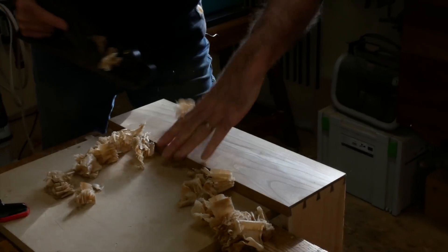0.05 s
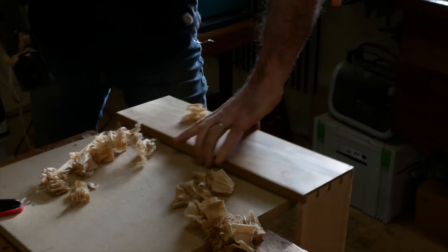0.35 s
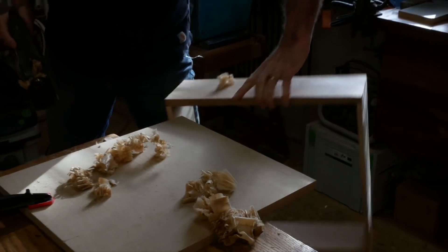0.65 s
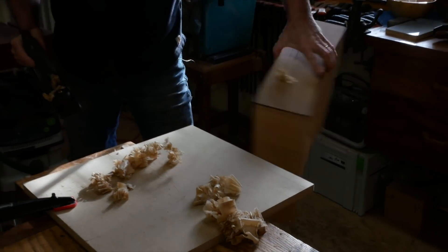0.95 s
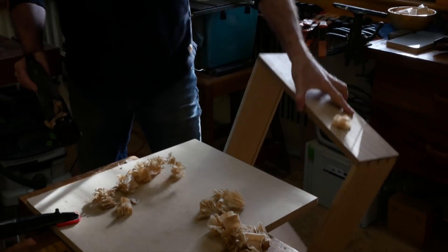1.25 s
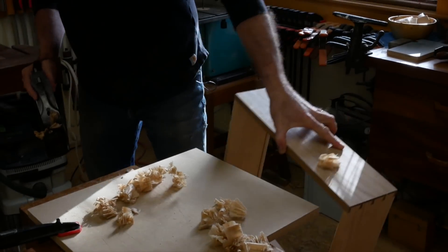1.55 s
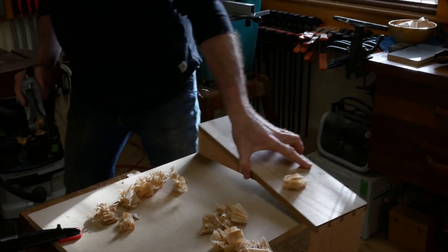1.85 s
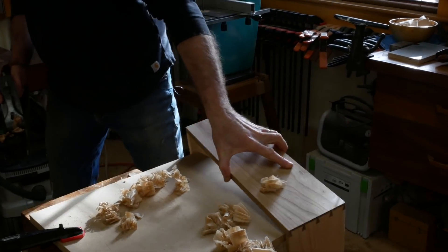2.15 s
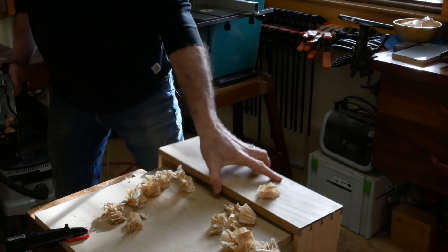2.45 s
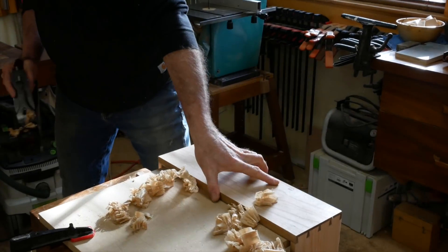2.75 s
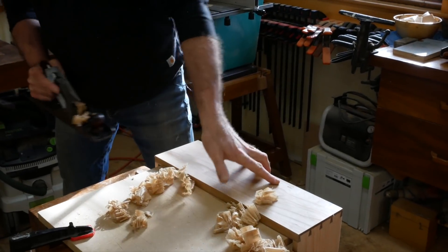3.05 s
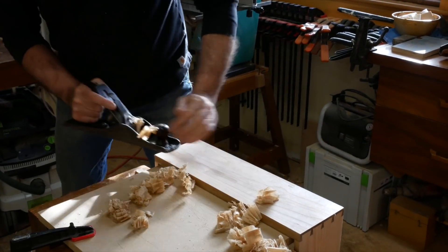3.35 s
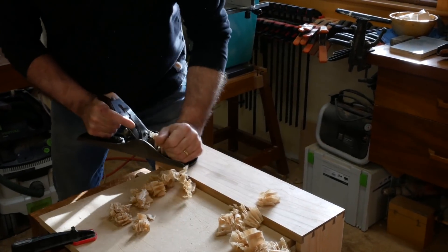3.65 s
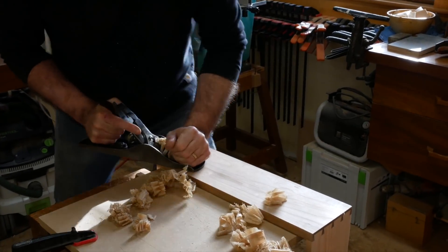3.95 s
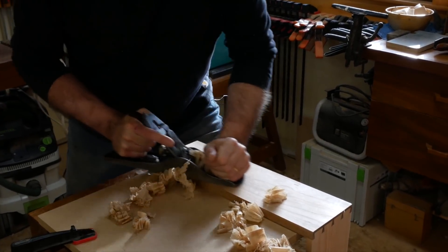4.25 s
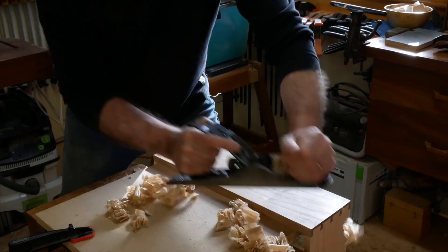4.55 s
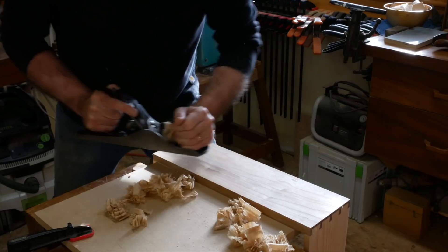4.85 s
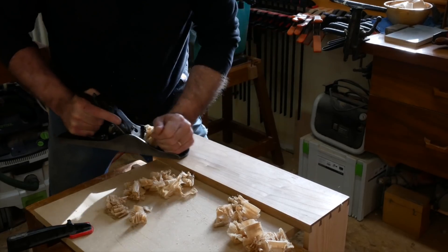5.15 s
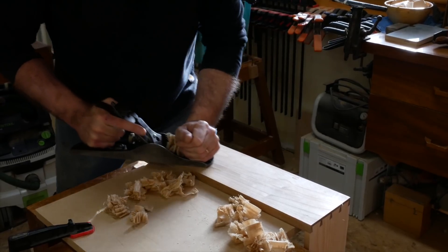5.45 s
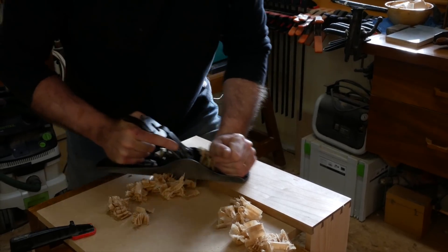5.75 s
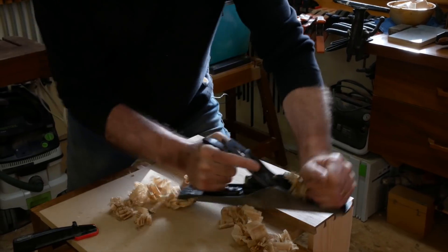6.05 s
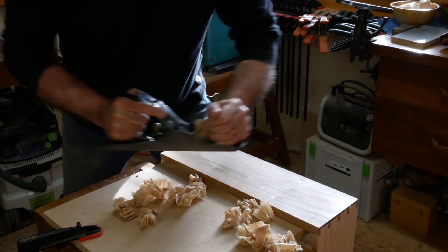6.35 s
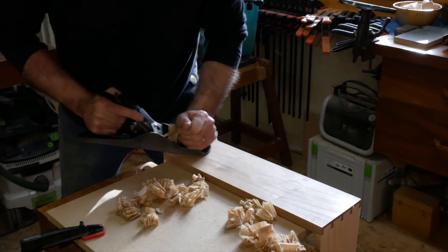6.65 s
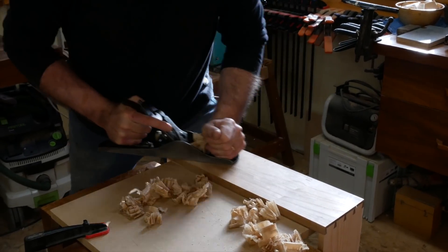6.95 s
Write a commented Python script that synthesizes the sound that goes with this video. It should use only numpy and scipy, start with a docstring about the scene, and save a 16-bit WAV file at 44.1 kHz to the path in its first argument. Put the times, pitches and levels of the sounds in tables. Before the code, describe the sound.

A wooden box slides off a workbench with a rub and a knock, then bumps back and rocks to rest with hollow clatters. A metal hand plane knocks down onto it and shaves the wood in three rough, hissing strokes with short pauses. Small bright ticks and faint squeaks fall between the strokes, over a low bench rumble. The microphone is close, in a small, slightly reverberant workshop.

```python
"""In a small workshop an open wooden box slides off the bench with a rub, is turned round, bumps back over the
bench top and rocks to rest. From 3.5 s a metal hand plane is set down on it three times, each knock ringing
their modes, and pushed along the grain while the bench rumbles. Tearing fibres shake the board, the iron and
the shaving, which hisses out of the mouth. As the first two long pushes end, air squeaks under the plane's sole
as it lifts and the shaving snaps off. One close microphone hears it all, with the room's reverberation."""
import sys
import numpy as np
from scipy import signal
from scipy.fft import rfft, irfft
from scipy.io import wavfile

SR = 44100
rng = np.random.default_rng(int(sys.argv[2]) if len(sys.argv) > 2 else 0)


def store_pcm(level_fs):
    """Save levels as 16-bit WAV."""
    pcm = np.round(np.clip(level_fs, -1, 1) * 32767).astype(np.int16)
    wavfile.write(sys.argv[1], SR, np.atleast_2d(pcm).T)


N = 317520

# Levels in the tables are relative. Spectra have in each row: frequency in Hz, density in dB.
# Wood and hands slide. Each row: loudest moment, rise and fall constants in seconds, rub and brush in dB.
SLIDES = [(.02, 0.017, 0.017, -49.5, -47.5), (.405, 0.044, .04, -29.5, -42), (.55, 0.014, 0.03, -41, -52),
          (1.05, 0.023, 0.014, -55, -63.5), (1.15, 0.027, 0.033, -44.5, -57),
          (1.886, 0.0018, 0.015, -46.5, -57), (1.919, 0.0082, 0.071, -37.5, -57),
          (2.35, 0.2, 0.13, -48.5, -52.5), (2.58, 0.022, 0.025, -33, -67.5)]
RUB_SPECTRUM = [(150, -37), (250, -7), (311, -21), (547, -1.5), (605, -8.5), (731, -4), (1150, -9.5),
                (1320, -1), (1880, -5), (2300, -3), (2820, -2.5), (4290, -10), (5410, -16), (8000, -34),
                (10400, -40.5), (17600, -120)]   # the body of the friction noise
BRUSH_SPECTRUM = [(3530, -6), (6000, -2), (7710, -4), (13400, 4), (15000, 4.5), (16000, -13)]   # its high hiss
# The box bumps the bench. Each row: start in seconds, force, extra thump and extra treble in dB.
BOX_BUMPS = [(.558, -15, 6, 13), (1.026, -44, -12, -10), (1.495, -61, -5, 4), (1.957, 2, -1, -29),
             (2.035, -16, 4.5, -13), (2.197, -19, 10.5, 1), (2.476, -16, 4, -2.5), (2.596, 2.5, -1.5, -15),
             (2.676, 0, -2, -26), (2.85, -23, 9, -40), (4.728, -14, -8, -5)]
# Modes of the free box. Each row: frequency in Hz, level in dB, t60 in seconds.
BOX_MODES = [(91.3, -27, 0.18), (135.7, -31.5, 0.29), (244.1, -23.5, 0.34), (311, -20, 0.14),
             (494, -31, 0.23), (562, -20, 0.066), (659, -16.5, 0.088), (742.5, -22.5, 0.15),
             (826, -21.5, 0.099), (923, -17.5, 0.073), (1090, -23.5, 0.052), (1286, -25.5, .08),
             (1430, -29, .05), (1520, -35, 0.079), (1894, -20.5, 0.041), (2140, -26.5, 0.045)]
CRACK_SPECTRUM = [(100, -6), (300, 11), (800, -2.5), (1500, 1.5), (2500, -11), (4000, -13.5), (7000, -28.5),
                  (11000, -30), (16000, -39)]   # the many short-lived modes of struck wood
# The box rocks to rest. Each row: start and length in seconds, first force and extra thump in dB.
SETTLING = [(1.963, .38, -14.5, 7), (2.603, .27, -12.5, -4.5)]
# Shavings snap and the plane's loose parts tick. Each row: start in seconds, level and extra clink in dB.
TICKS = [(3.176, -36.5, -9), (3.603, -11, -2), (4.5272, -12, 4), (4.565, -17.5, -6), (4.6162, -15, 2),
         (4.6951, -5, -3.5), (6.2113, -32, 7.5)]
SNAP_SPECTRUM = [(3820, -32), (6500, -8.5), (7040, -25.5), (7590, 2), (8240, -14), (9480, -0.5),
                 (12500, -9), (13900, -4), (16000, -2.5)]   # the bright top of a tick
# The lower ring of a tick. Each row: frequency and bandwidth in Hz, level in dB.
CLINK_PEAKS = [(2200, 92, -5.5), (3090, 170, -1.5), (4090, 180, -0.5), (4840, 87, 3.5), (5390, 64, 2.5)]
# The plane lands. Each row: start in seconds, toe force, extra thump, extra treble and heel force in dB.
LANDINGS = [(3.551, -2, 0.5, 10.5, -2), (3.928, -9, 3.5, -5, -9), (5.078, -1.5, -6, 6.5, -21),
            (6.68, -4, -7, 6, -23.5)]
# Modes of the plane pressed on the box. Each row: frequency in Hz, level in dB, t60 in seconds.
PLANE_MODES = [(97, -31.5, 0.28), (131, -23, 0.11), (206.7, -21.5, 0.13), (241, -18, 0.15),
               (282, -9.5, 0.12), (386, -16.5, 0.075), (482, -16, 0.38), (631, -15.5, 0.16),
               (732, -17, 0.086), (848, -26.5, 0.06), (931, -15, 0.034), (1115, -17, 0.035),
               (1285, -17, 0.12), (1398, -14, 0.032), (1519, -19.5, 0.047), (1800, -22, 0.032),
               (1880, -24, 0.06), (3110, -25.5, 0.048), (3320, -23.5, 0.026), (3680, -21, 0.016),
               (4330, -32.5, 0.016), (5520, -32.5, 0.041)]
# Weight comes onto the bench or leaves it. Each row: start and end in seconds, level in dB.
BENCH_ROCKING = [(3.91, 4.09, -47), (4.543, 4.777, -48.5), (4.933, 5.197, -49.5), (6.373, 6.893, -48.5)]
RUMBLE_SPECTRUM = [(15, -50), (25, -15), (54, 1), (150, -3.5), (195, -5), (220, -0.5), (290, -12.5),
                   (480, -120)]   # the rocking bench
# Long cuts and short nudges of the plane.
# Each row: start, hardest moment and end in seconds, effort, extra board and extra shaving in dB.
PUSHES = [(4.115, 4.26, 4.5, .5, 0, 1.5), (4.567, 4.57, 4.6, -14, 7, 4), (5.325, 5.335, 5.36, -9, -1, 1),
          (5.48, 6.02, 6.06, 0, 2, -1), (6.214, 6.218, 6.235, -13, -5, 3),
          (6.802, 6.815, 6.84, -8.5, 0, -1), (6.945, 7.19, 7.3, 1, -5, -3)]
BOARD_SPECTRUM = [(53, -45), (90, -29), (204, -8.5), (251, -1), (441, -5), (569, -1.5), (754, -2), (832, 0),
                  (971, -7), (1060, -2.5), (1360, -7), (1960, -6.5), (2140, -4), (2360, -8.5), (2600, -2),
                  (3380, -68), (5720, -120)]   # the wood under the cut
# Resonances of iron, curling shaving and edge. Each row: frequency and bandwidth in Hz, level in dB.
IRON_PEAKS = [(2726, 200, -0.5), (3050, 280, -2.5), (3534, 285, 1), (3840, 260, 1.5), (4170, 380, -1.5),
              (4900, 470, -7.5), (5550, 440, -5)]
CURL_PEAKS = [(7500, 2000, -6), (9330, 470, 3.5), (9800, 660, -0.5), (10350, 420, 1), (11030, 330, -4)]
EDGE_PEAKS = [(11900, 600, -12), (13640, 1600, 20), (14300, 600, -12), (15000, 540, 14)]
# Air squeaks under the lifting sole. Each row: centre in seconds, level in dB, pitch in Hz, half-length in
# seconds.
SQUEAKS = [(4.556, -30, 590, 0.0086), (4.735, -22, 415, 0.0092), (4.770, -30.5, 170, 0.0039),
           (6.12, -30, 660, 0.01)]
# Decay of the workshop's reverberation. Each row: frequency in Hz, t60 in seconds.
ROOM_T60 = [(80, .85), (210, .75), (560, .75), (1470, .75), (3900, .8), (12000, .9)]
# Strength of the reverberation. Each row: frequency in Hz, level in dB.
ROOM_LEVELS = [(80, 1.5), (250, -8), (600, -5.5), (1400, -5.5), (3500, -9), (12000, -8.5)]
BACKGROUND_SPECTRUM = [(12, -30.5), (20, 4.5), (150, -8), (210, -9), (301, -10), (410, -11), (485, -4),
                       (527, -12.5), (897, -14.5), (1220, -16), (1330, -11.5), (2750, -14), (4940, -17),
                       (8650, -20.5), (16000, -21)]   # steady, mostly low noise


def from_db(db):
    """Amplitude grows tenfold with every 20 dB."""
    return 10 ** (np.asarray(db) / 20)


def unit_rms(x):
    """Dividing by the rms gives a signal unit power."""
    return x / np.sqrt(np.mean(x ** 2) + 1e-20)


def at_hz(points, hz):
    """Interpolation follows log frequency, as pitch does."""
    knots_hz, values = np.transpose(points)
    return np.interp(np.log(np.maximum(hz, 1)), np.log(knots_hz), values)


def colour(x, spectrum):
    """Filtering multiplies spectra; this filter falls steeply past its ends. The result has rms 1."""
    hz = np.fft.rfftfreq(len(x), 1 / SR) + 1
    skirts = 1 / (1 + (.8 * spectrum[0][0] / hz) ** 8) / (1 + (.8 * hz / spectrum[-1][0]) ** 8)
    return unit_rms(irfft(rfft(x) * from_db(at_hz(spectrum, hz)) * skirts, len(x)))


def resonate(x, peaks):
    """Forced resonators respond in parallel; the sum is band-limited and has rms 1."""
    out = 0
    for k, (hz, width, db) in enumerate(peaks):
        radius = np.exp(-np.pi * width / SR)
        poles = [1, -2 * radius * np.cos(2 * np.pi * hz / SR), radius ** 2]
        out = out + (-1) ** k * from_db(db) * (1 - radius ** 2) / 2 * signal.lfilter([1, 0, -1], poles, x)
    return unit_rms(butter(out, [0.81 * peaks[0][0], 1.11 * peaks[-1][0]], "band"))


def butter(x, hz, kind, order=2):
    """A causal Butterworth filter has a maximally flat passband."""
    return signal.sosfilt(signal.butter(order, np.clip(hz, 10, .45 * SR), kind, fs=SR, output="sos"), x)


def drift(per_s):
    """Random values joined by straight lines make a smooth fluctuation of rms 1."""
    knots = rng.standard_normal(int(N / SR * per_s) + 2)
    return unit_rms(np.interp(np.arange(N) / SR * per_s, np.arange(len(knots)), knots))


def grains(per_s, spread_db):
    """Independent clicks of uneven size make shot noise."""
    clicks = (rng.random(N) < per_s / SR) * rng.choice([-1, 1], N)
    return clicks * from_db(spread_db * np.minimum(rng.exponential(1, N), 5)) + 1e-18


def envelope(start, end, rise_s, fall_s):
    """Exponential growth and decay, given as time constants, flank a hold from start to end."""
    t = np.arange(N) / SR
    exponent = np.minimum(t - start, 0) / rise_s - np.maximum(t - end, 0) / fall_s
    return np.exp(np.maximum(exponent, -40))


def add(track, start, sound):
    """By superposition, a sound adds to the track from its start in seconds."""
    i = max(int(start * SR), 0)
    track[i:i + len(sound)] += sound[:N - i]


def sliding(rub_db, brush_db):
    """Sliding friction is noise: smooth wood catches lightly on many tiny points."""
    rub, brush = sum(np.outer(from_db(levels_db), envelope(loudest, loudest, rise, fall))
                     for loudest, rise, fall, *levels_db in SLIDES)
    friction = grains(per_s=6200, spread_db=1.0) * from_db(1.35 * drift(70))
    return (rub * from_db(rub_db) * colour(friction, RUB_SPECTRUM)
            + brush * from_db(brush_db) * colour(friction, BRUSH_SPECTRUM))


def impacts(rows, modes, crack_db, crack_t60, vary_db, thump_hz, hard_hz):
    """An impact excites damped modes and a crack; weight lifts the bass, a hard contact the treble."""
    t, out = np.arange(SR // 2) / SR, np.zeros(N)
    hz = np.fft.rfftfreq(len(t), 1 / SR)
    mode_hz, mode_db, t60 = np.transpose(modes)
    rings = np.sin(2 * np.pi * mode_hz[:, None] * t) * from_db(-60 * t / t60[:, None])
    signs = (-1) ** np.arange(len(modes))
    fade = np.minimum(1, 10 * (1 - t / t[-1])) ** 2
    for start, force_db, thump_db, hard_db in rows:
        crack = colour(rng.standard_normal(len(t)), CRACK_SPECTRUM)
        crack *= from_db(crack_db - 60 * t / crack_t60)
        mode_gains = signs * from_db(mode_db + vary_db * rng.standard_normal(len(modes)))
        bass_db = thump_db / (1 + (hz / thump_hz) ** 4)
        treble_db = hard_db * (1 - 1 / (1 + (hz / hard_hz) ** 6))
        spectrum = rfft(mode_gains @ rings + crack) * from_db(force_db + bass_db + treble_db)
        add(out, start, irfft(spectrum, len(t)) * fade)
    return butter(out, 42.7, "high")   # small bodies radiate no deep bass


def box_knocks(gap_s, decay_db_per_s, hard_db):
    """The struck box vibrates freely; set down hard, it loses energy in small, uneven knocks."""
    rows = list(BOX_BUMPS)
    for start, length, force_db, thump_db in SETTLING:
        for k, (timing, strength) in enumerate(rng.uniform(-1, 1, size=(16, 2))):
            delay = gap_s * max(k + .5 * timing, 0)
            if delay < length:
                knock_db = force_db - decay_db_per_s * delay + 4 * strength
                rows.append((start + delay, knock_db, thump_db, hard_db))
    return impacts(rows, BOX_MODES, crack_db=-12, crack_t60=0.058, vary_db=3, thump_hz=406, hard_hz=2310)


def ticks(level_db, clink_db, t60):
    """A brittle snap is a broadband transient: a bright burst with a brief clink under it."""
    t, out = np.arange(SR // 8) / SR, np.zeros(N)
    for start, tick_db, extra_clink_db in TICKS:
        burst = rng.standard_normal(len(t))
        snap = colour(burst, SNAP_SPECTRUM)
        clink = from_db(clink_db + extra_clink_db) * resonate(burst, CLINK_PEAKS)
        add(out, start, (snap + clink) * from_db(tick_db + level_db - 60 * t / t60))
    return out


def plane_knocks(heel_lag_s, heel_weight_db, heel_hard_db):
    """Plane and box ring as one coupled body: the toe strikes, then the heel with constant weight."""
    toes = [row[:-1] for row in LANDINGS]
    heels = [(start + heel_lag_s, force_db, heel_weight_db - force_db, heel_hard_db)
             for start, *_, force_db in LANDINGS]
    return impacts(toes + heels, PLANE_MODES,
                   crack_db=-5, crack_t60=0.028, vary_db=3.5, thump_hz=520, hard_hz=2520)


def bench_rumble():
    """A changing load, the worker's weight, drives low vibration of the bench."""
    rocking = sum(from_db(db) * envelope(start, end, rise_s=0.065, fall_s=.09)
                  for start, end, db in BENCH_ROCKING)
    return rocking * colour(rng.standard_normal(N), RUMBLE_SPECTRUM)


def push_gains(swell_db_per_s, sizzle_db_per_s):
    """Board, iron, curl and edge follow power laws of the effort, which peaks once in each push."""
    t, gains = np.arange(N) / SR, 0
    for start, hardest, end, peak_db, board_db, shaving_db in PUSHES:
        now = np.clip(t, start, end)
        effort_db = peak_db - swell_db_per_s * np.abs(now - hardest)
        sizzle_db = sizzle_db_per_s * (now - start)   # rises as the shaving grows
        layers_db = [0.84 * effort_db + board_db, effort_db,
                     1.5 * effort_db + shaving_db, effort_db + shaving_db + sizzle_db]
        gains = gains + envelope(start, end, rise_s=0.031, fall_s=0.016) * from_db(layers_db)
    return gains


def cutting(board_db, iron_db, curl_db, edge_db):
    """Fibres fracture in uneven bunches and force board, iron and shaving into vibration together."""
    board, iron, curl, edge = push_gains(swell_db_per_s=16.5, sizzle_db_per_s=28.5)
    fibres = grains(per_s=9000, spread_db=1.0)
    grain_db, chatter_db = 1.64 * drift(45), drift(500)
    tearing = fibres * from_db(grain_db + chatter_db)
    return (board * from_db(board_db) * colour(tearing, BOARD_SPECTRUM)
            + iron * from_db(iron_db) * resonate(tearing, IRON_PEAKS)
            + curl * from_db(curl_db) * resonate(tearing, CURL_PEAKS)
            + edge * from_db(edge_db) * resonate(tearing, EDGE_PEAKS))


def squeaks(octave_db, roughness):
    """Air squeezed or sucked under the plane's sole as it lifts gives a few uneven cycles of a tone."""
    t, out = np.arange(N) / SR, 0
    waver = 1 + roughness * drift(300)
    for centre, db, hz, half_length in SQUEAKS:
        phase = 2 * np.pi * np.cumsum(hz * waver) / SR
        tone = np.sin(phase) + from_db(octave_db) * np.sin(2 * phase)
        out = out + from_db(db) * np.exp(-((t - centre) / half_length) ** 2) * tone
    return out


def reverberation(x, build_s):
    """A diffuse field builds up quickly and decays exponentially in each half-octave band."""
    t, response = np.arange(SR) / SR, 0
    build_up = 1 - np.exp(-(t / build_s) ** 2)
    edges_hz = 45 * 2 ** (np.arange(18) / 2)
    for low, high in zip(edges_hz, edges_hz[1:]):
        hz = np.sqrt(low * high)
        noise = butter(rng.standard_normal(SR), [low, high], "band")
        tail = unit_rms(noise * from_db(-60 * t / at_hz(ROOM_T60, hz)) * build_up)
        unity_gain = np.sqrt(2 * (high - low)) / SR
        response = response + tail * unity_gain * from_db(at_hz(ROOM_LEVELS, hz))
    return signal.fftconvolve(x, response)[:N]


def scene():
    """The sources superpose in the middle; only a trace of the room differs between the channels."""
    box = box_knocks(gap_s=.036, decay_db_per_s=60, hard_db=-22)
    plane = plane_knocks(heel_lag_s=.0115, heel_weight_db=-4.5, heel_hard_db=-1.5)
    cut = cutting(board_db=-33.5, iron_db=-32.5, curl_db=-36.5, edge_db=-46)
    slide = sliding(rub_db=-3.0, brush_db=-3.5)
    small_sounds = ticks(level_db=-7.5, clink_db=0.5, t60=0.027) + squeaks(octave_db=-4, roughness=0.11)
    into_room = from_db(1.5) * (box + cut + slide) + from_db(-1) * plane + from_db(-2) * small_sounds
    room = reverberation(into_room, build_s=0.01)
    side = from_db(-30) * reverberation(into_room, build_s=0.0065)
    background = from_db(-59) * colour(rng.standard_normal(N), BACKGROUND_SPECTRUM)
    middle = box + plane + cut + slide + small_sounds + room + bench_rumble() + background
    return np.array([middle + side, middle - side])


def record(dry):
    """Soft saturation rounds the hardest knocks, and a steep low-pass removes the top."""
    rounded = 1.2 * np.tanh(dry / 1.2)
    return signal.sosfilt(signal.ellip(10, .1, 70, 15800, fs=SR, output="sos"), rounded)


dry = scene()
out = record(dry)
store_pcm(out)
```